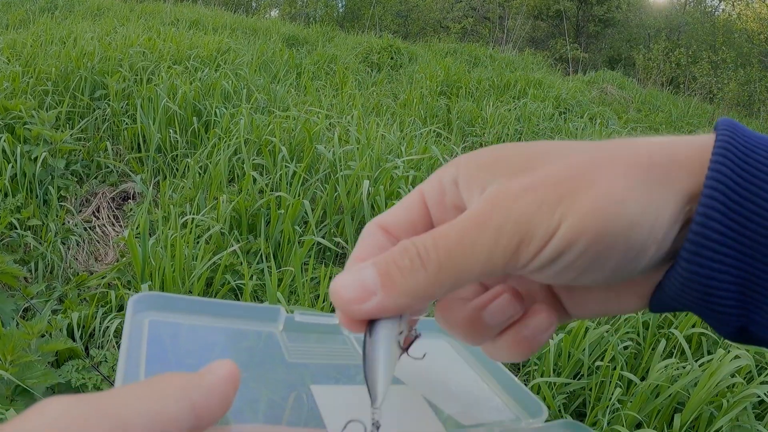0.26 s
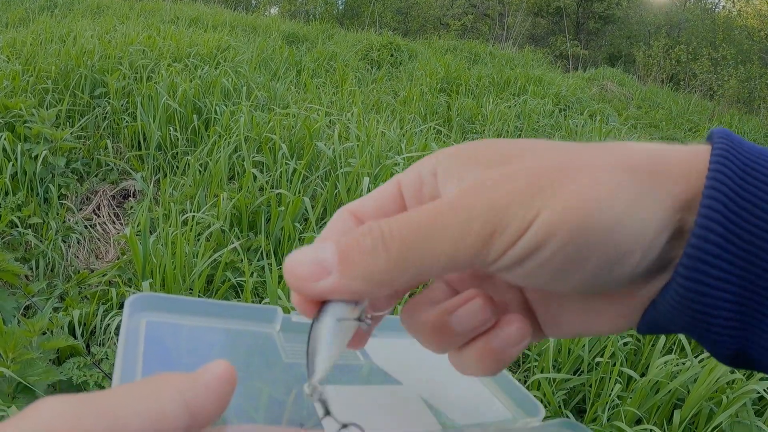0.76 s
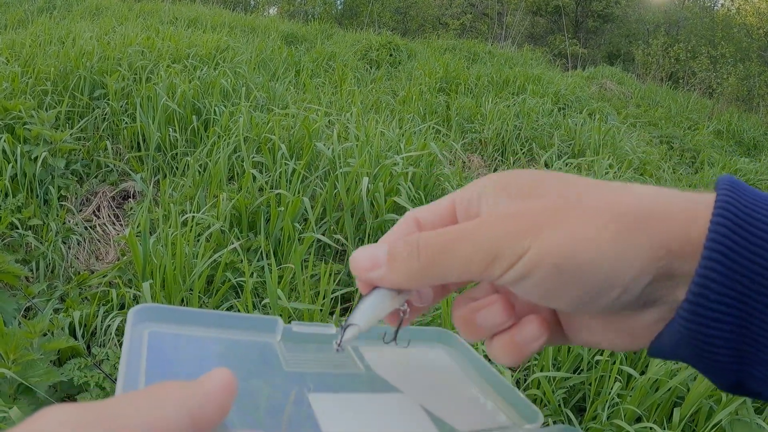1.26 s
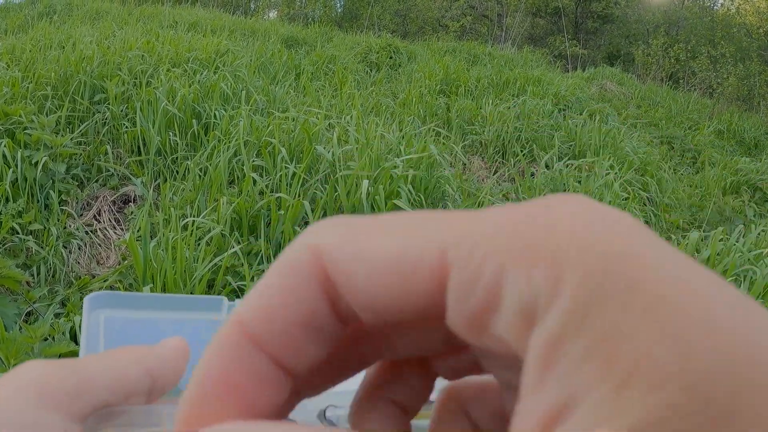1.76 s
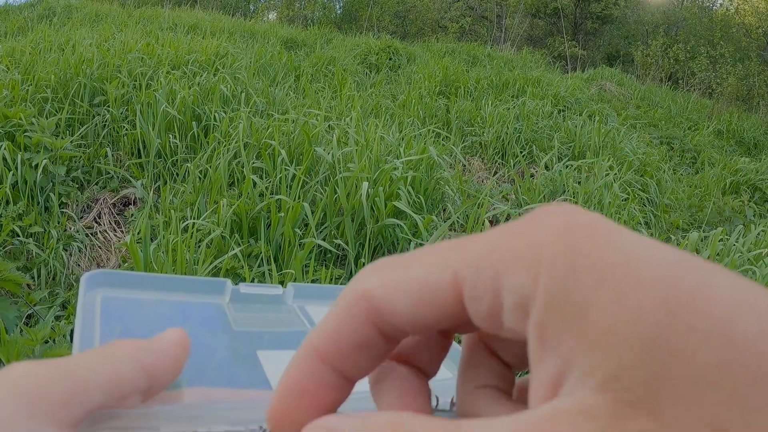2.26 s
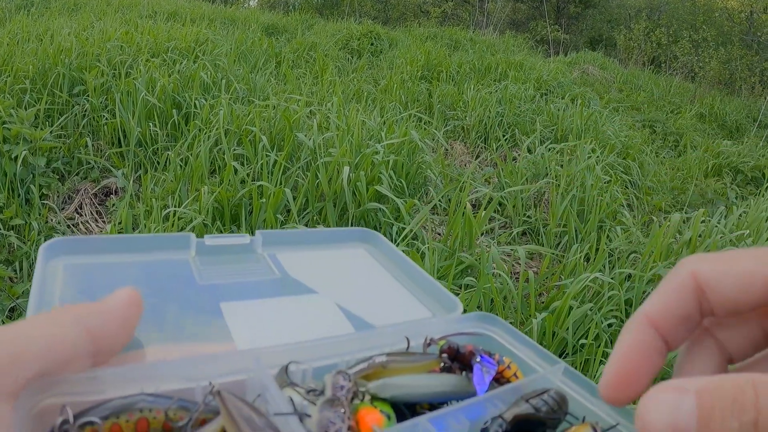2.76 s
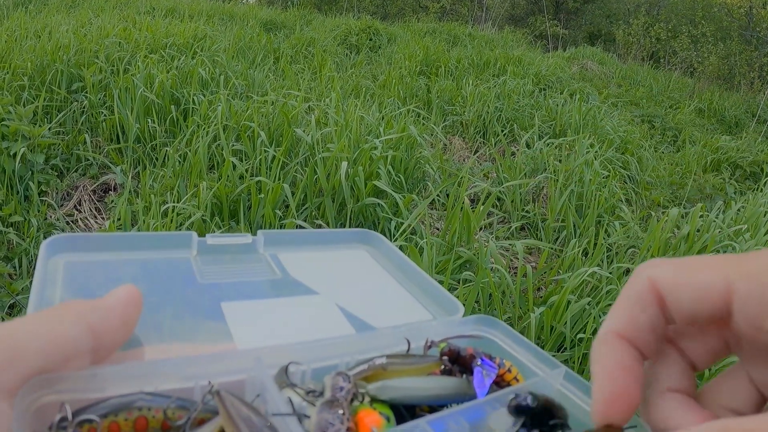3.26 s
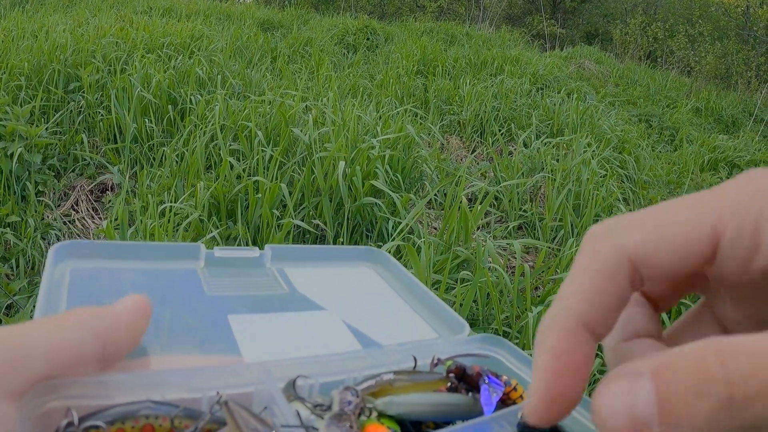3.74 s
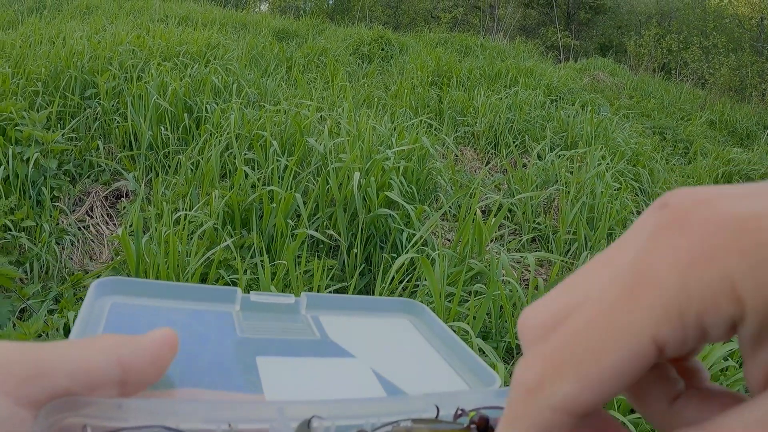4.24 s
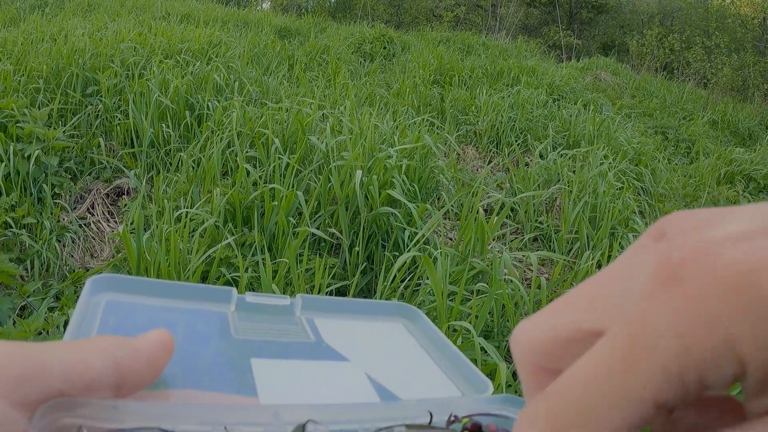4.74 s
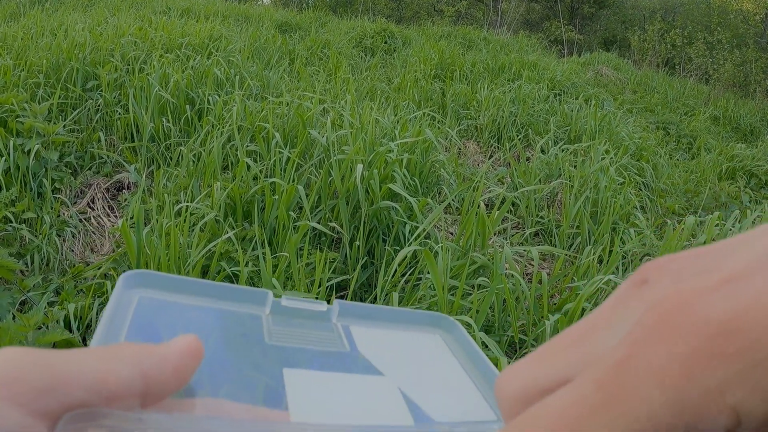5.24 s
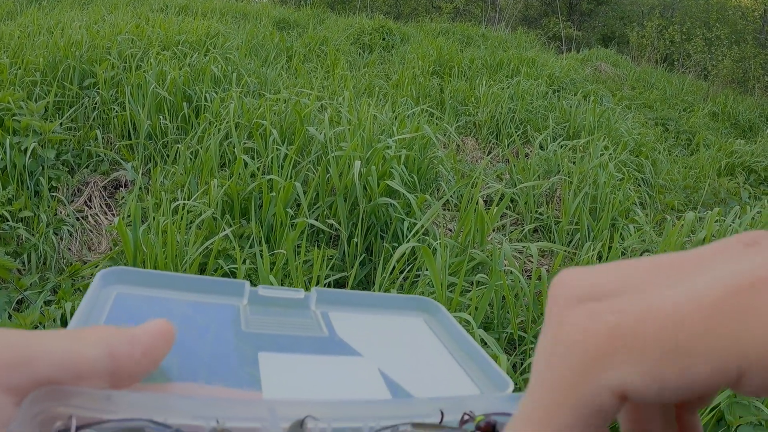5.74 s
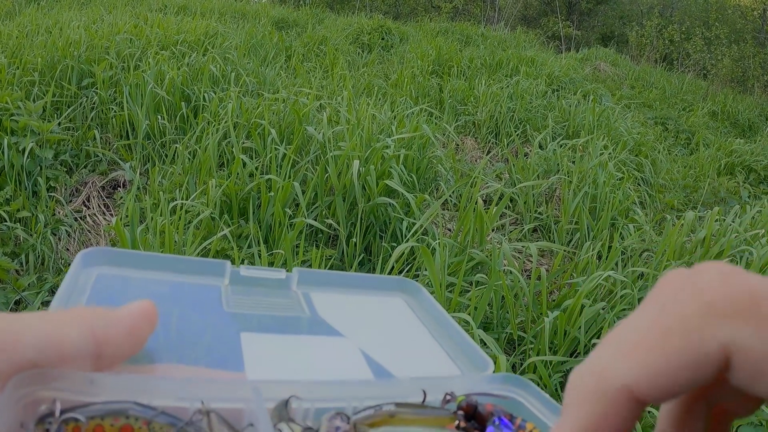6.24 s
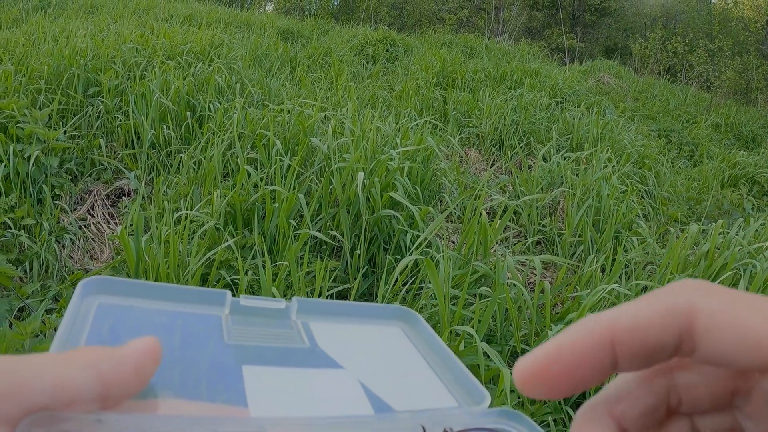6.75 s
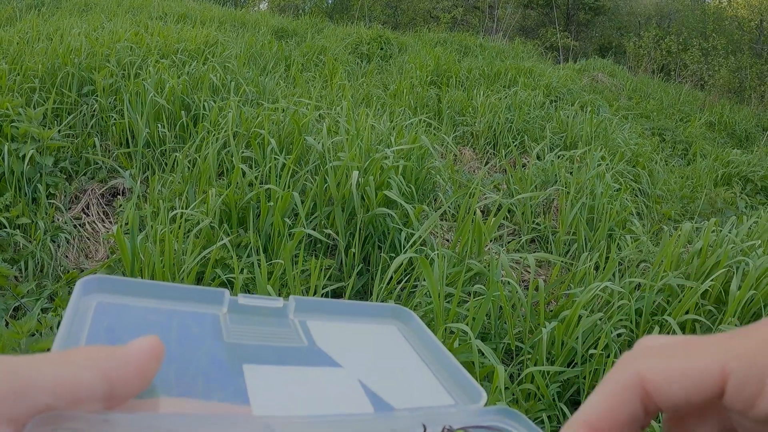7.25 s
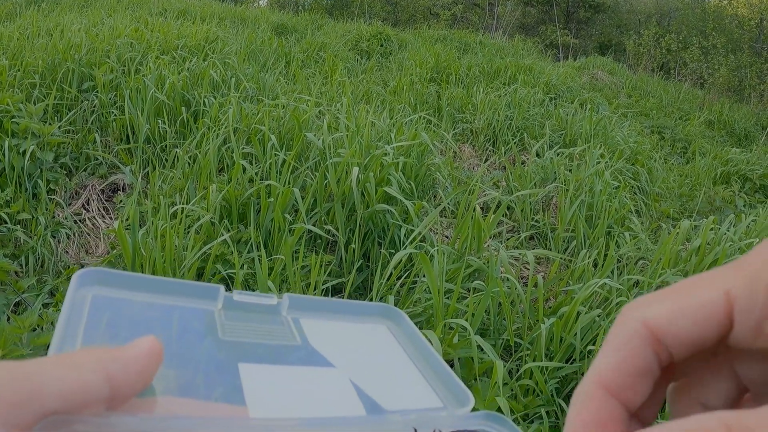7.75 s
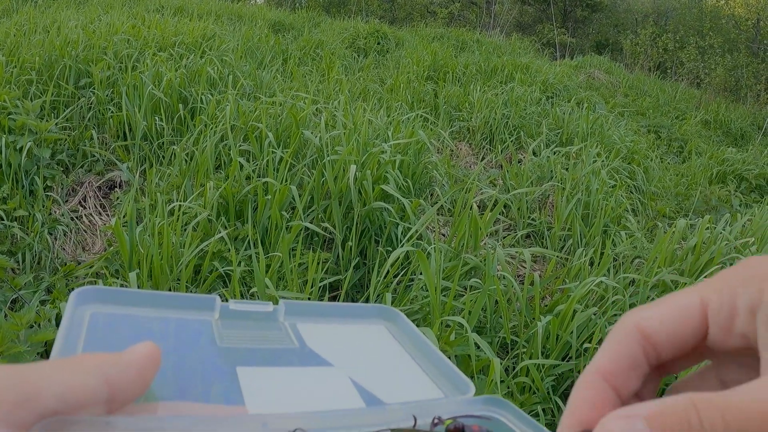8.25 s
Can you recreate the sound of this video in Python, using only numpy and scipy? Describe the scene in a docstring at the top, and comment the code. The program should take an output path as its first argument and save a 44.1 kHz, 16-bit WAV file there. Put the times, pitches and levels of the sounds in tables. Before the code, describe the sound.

Hard plastic lures with small metal hooks scrape, knock and rattle in a tray in fits and starts, with faint songbirds and river murmur outdoors.

```python
"""Sorting lures in a tackle box

A hand sorts fishing lures in a plastic box close by, in a meadow by a river. Hooks snag on the box wall,
then hollow lures rattle: damped sines plus brief noise bursts through resonances. Chatter of small random
grains follows the knocks and the fingers; thuds are low noise and a low sine. Songbirds are gliding sines,
a warbler's buzz is a gated click train with noise; hush, river murmur and wind are shaped noise.
"""
import sys
import numpy as np
from scipy import signal
from scipy.fft import rfft, irfft, next_fast_len
from scipy.io import wavfile
from scipy.ndimage import map_coordinates

SR = 44100
rng = np.random.default_rng(int(sys.argv[2]) if len(sys.argv) > 2 else 0)


def pcm_store(signal):
    """Save signal as 16-bit PCM."""
    levels = np.round(np.clip(np.atleast_2d(signal), -1, 1) * 32767)
    wavfile.write(sys.argv[1], SR, levels.astype(np.int16).T)


N = 374850

# hooks and lure on the box wall: (time [s], relative level [dB], wall ring [Hz], steel re contact [dB])
SNAGS = [(0.0111, -20.5, 2150, -9), (0.036, -16, 2200, -2.5), (0.0476, -25, 2500, -9.5),
         (0.061, -22.5, 2060, -6), (0.0948, -21, 2960, -17), (0.152, -34.5, 2000, -23),
         (0.167, -7.5, 2330, -7.5), (0.1724, -28, 1050, 15), (0.1873, -46.5, 2170, 20.5),
         (0.2622, -16.5, 2160, 5.5), (0.2692, -14, 2180, -4), (0.278, -14, 1830, -7),
         (0.291, -7.5, 2580, -14.5), (0.3, -11.5, 2250, -2), (0.309, -12, 1050, -3),
         (0.315, -15.5, 1950, 1), (0.3204, -10, 2710, -15), (0.3292, -15, 2240, -21.5),
         (0.3502, -21, 2080, -2), (0.368, -4.5, 2470, -4.5), (0.378, -7.5, 2000, -17.5),
         (0.395, -20.5, 2220, -9.5), (0.4097, -20, 1090, -3.5), (0.4188, -28, 1820, -22.5),
         (0.427, -19, 1810, -8), (0.467, -26, 1900, -18), (0.516, -12.5, 2380, -2), (0.5238, -16, 1270, 0),
         (0.5387, -17, 2140, 0), (0.5746, -16.5, 2130, -33.5), (0.5777, -19.5, 2420, -13.5),
         (0.597, -21.5, 2540, -2.5), (0.6093, -27, 2200, 3), (0.6258, -33, 2200, 2),
         (0.7084, -34, 2100, 11.5), (0.773, -26.5, 2130, -11), (0.8025, -9, 2090, -3.5),
         (0.8106, -10.5, 2040, -1.5), (0.819, -23, 1880, 7.5), (0.83, -25.5, 1920, 14.5),
         (0.8422, -24, 2330, 4), (0.8773, -17.5, 1830, -33), (0.898, -20.5, 1110, -5),
         (0.9126, -10, 2670, -13), (0.92, -13, 1870, -31), (0.931, -16, 1080, -20),
         (0.9361, -10.5, 2330, -1), (0.944, -5, 2450, -11), (0.9718, -18, 1110, -27), (0.985, -16, 2520, 6),
         (0.9998, -14, 1950, -0.5), (1.017, -17.5, 2500, -12), (1.025, -16.5, 2570, -14.5),
         (1.032, -13, 1790, -14.5), (1.038, -14.5, 2650, -18), (1.0466, -28, 2080, -3),
         (1.0566, -8.5, 2820, 0.5), (1.0752, -11, 1890, -7), (1.0864, -8.5, 2160, -1),
         (1.108, -23.5, 1010, 0), (1.145, -19.5, 1830, 11.5), (1.2533, -25.5, 2370, -2),
         (1.2915, -44, 2700, -2), (1.377, -53.5, 2700, 17.5), (1.4633, -44.5, 2770, 8),
         (1.8355, -23, 2550, 5.5), (1.849, -23, 2550, 8), (1.8585, -18, 2300, 3), (1.864, -25, 2310, 7.5),
         (1.88, -17, 2340, -6), (1.8874, -9.5, 2480, 2), (1.9027, -28, 2420, -10), (1.9205, -9.5, 2570, 3),
         (1.9319, -6, 2450, -17.5), (1.938, -20, 2420, 6), (1.959, -30, 845, 4), (2.1534, -46, 2530, 6),
         (2.169, -47, 2350, -1), (2.2546, -33, 2300, 2.5), (2.2874, -32.5, 2450, -4.5),
         (2.32, -23, 1800, -2.5), (2.3587, -11, 1960, -0.5), (2.364, -29, 2640, 4.5),
         (2.4273, -14, 1920, -8)]
# lures knocking in their tray: (time [s], relative level [dB], steel re contact [dB])
RATTLES = [(2.864, -40, 2), (2.905, -43, -12), (2.945, -49, -12), (2.9888, -40, -7), (3.0735, -19, -24),
           (3.0907, -23.5, -19), (3.1001, -18, -13), (3.1053, -22.5, -6.5), (3.179, -29, -26),
           (3.2186, -17, -8), (3.247, -21, -13), (3.2505, -24, -6), (3.2601, -11, -11), (3.3843, -17, -6.5),
           (3.3928, -23, -13.5), (3.4246, -21, 6), (3.4282, -15, 7), (3.4381, -9.5, -3.5),
           (3.4452, -10, -26), (3.4641, -3.5, -17), (3.4757, -8, -17.5), (3.482, -6.5, -21),
           (3.4883, -13, -5.5), (3.495, -10, -9), (3.5, -4.5, -5.5), (3.5085, -14, -4), (3.5157, -9.5, -20),
           (3.54, -43, -13), (3.596, -51, -15.5), (3.612, -60, -12), (3.626, -55, -22),
           (3.9319, -28.5, -14), (3.9744, -26.5, -2.5), (4.0342, -26.5, -25), (4.0756, -20.5, -10),
           (4.0895, -19.5, -20), (4.1575, -11.5, -16), (4.1744, -15, -12), (4.1788, -8, -22),
           (4.1884, -15, -9), (4.204, -17, -11), (4.3487, -40, -11.5), (4.3635, -16.5, -22),
           (4.381, -21, -9), (4.3955, -9, -4.5), (4.4061, -16.5, -2), (4.4348, -15.5, -10),
           (4.473, -20, -21), (4.4773, -26.5, 3), (4.4855, -27, -3), (4.56, -20, -5), (4.575, -8, -4),
           (4.611, -13.5, -5.5), (4.6587, -13.5, 0), (4.664, -10.5, -23), (4.6912, -16.5, -1),
           (4.72, -11.5, -10), (4.727, -7.5, -8), (4.739, -5, -13), (4.746, -25.5, 9), (4.762, -14.5, -29),
           (4.783, -21, -10), (4.797, -21, -2), (4.8094, -21, -5), (4.8225, -25.5, 0), (4.8774, -19, -25),
           (4.8843, -9, -32), (4.8929, -26.5, 16.5), (4.8987, -5, -18), (4.902, -9, -4), (4.92, -10, -13),
           (4.9426, -26, -2), (4.9523, -27, 3), (4.957, -10, -3.5), (4.9693, -30, 10.5), (5.0944, -30, 3),
           (5.116, -33.5, 8.5), (5.198, -29, -4), (5.246, -22, 0), (5.254, -3.5, -9.5), (5.3086, -28, -21),
           (5.3123, -20.5, -11), (5.333, -39, 0), (5.361, -27.5, -10), (5.4071, -26.5, -20),
           (5.437, -24, 5.5), (5.4635, -23.5, -4), (5.4869, -11, -8), (5.4978, -10.5, 0.5),
           (5.5073, -18, -2), (5.515, -12, -4), (5.5396, -25, -9), (5.6068, -29, 7), (5.853, -20, -27),
           (5.8681, -17.5, -21), (5.944, -21.5, -13), (5.9555, -14, -11), (5.959, -10, -3),
           (5.973, -10, -9), (5.9961, -16.5, 9.5), (5.9995, -14, 4), (6.005, -16, 3), (6.0128, -12, 2),
           (6.0194, -35, -15), (6.0396, -20.5, -12), (6.1187, -24.5, 3), (6.153, -29, -27.5),
           (6.245, -24, -11), (6.458, -36, 3.5), (6.5497, -9, -21), (6.5574, -30, -20), (6.5624, -15, -10),
           (6.57, -18, 6), (6.5768, -11, -14), (6.589, -17, -16), (6.647, -19, 3), (6.6518, -7.5, -20),
           (6.6658, -23, 3.5), (6.6801, -6.5, -16), (6.7282, -23.5, 1.5), (6.7575, -26, -16),
           (6.7638, -15.5, -30), (6.7701, -26, -17), (6.8024, -6.5, -16), (6.8248, -12, -11),
           (6.8305, -15, -11), (6.849, -16.5, -14), (6.86, -23.5, -19), (7.2588, -22, 0), (7.27, -12.5, 5),
           (7.291, -26, 4.5), (7.3095, -18.5, -20), (7.3317, -25.5, -20), (7.4286, -21.5, -4.5),
           (7.468, -33, -12), (7.5849, -17, -6), (7.5945, -19, -1), (7.6138, -8.5, -3), (7.6219, -13, -4),
           (7.6335, -17, -7), (7.6384, -8, 0), (7.6584, -16, -7), (7.6745, -6, -19), (7.6808, -19, -7),
           (7.7026, -26, 7), (7.71, -18, -5), (7.7209, -23.5, -19), (7.8042, -23.5, -22), (7.8733, -22, -2),
           (7.8922, -16, -8), (7.936, -29, -7), (7.96, -30, 6), (7.9708, -24, 2), (7.9771, -6.5, -2.5),
           (7.9837, -7, -18), (8.0424, -18, -13), (8.0512, -6, -8), (8.0735, -15, -1), (8.084, -13, -2),
           (8.102, -30, -8), (8.1158, -5, -2.5), (8.1303, -21, -10), (8.1403, -16, -7), (8.1563, -18, 3.5),
           (8.1791, -14, -9), (8.1908, -16, -1), (8.21, -14, 4), (8.252, -6.5, -10.5), (8.2593, -16.5, -12),
           (8.282, -15, -21), (8.2966, -15.5, -19), (8.3158, -16, -12), (8.345, -14.5, -17),
           (8.378, -13, -7), (8.3944, -10, -5.5), (8.4027, -23, -3), (8.4127, -22, -9),
           (8.4274, -5.5, -9.5), (8.4373, -14, -5), (8.4436, -16, -13), (8.4871, -23, -11)]
# whole box pushed: (time [s], relative push [dB], relative give of the hand [dB])
THUDS = [(1.229, -13, -37), (1.929, -14, -53.5), (2.259, -28, -47), (3.081, -13.5, -64), (3.435, -11, -50),
         (3.493, -4, -47), (4.39, -14.5, -58), (4.732, -16, -44), (4.909, -14.5, -39), (5.49, -13, -60),
         (7.27, -16, -45)]
# fingers among the lures: (start [s], end [s], relative rustle [dB], relative hook fizz [dB])
BOUTS = [(-.05, 0.138, -54, -3.5), (.15, 0.265, -53, -0.5), (0.272, 0.426, -36.5, -8),
         (0.469, 0.641, -54, -6), (0.681, 0.734, -54.5, 4), (0.763, 1.14, -52.5, -6), (1.183, 1.24, -55, 3),
         (1.845, 1.988, -55, -1), (2.252, 2.31, -53.5, -5.5), (2.31, 2.396, -41.5, -8.5),
         (2.428, 2.548, -63.5, -25), (2.842, 2.946, -63, -12.5), (2.972, 3.018, -53, -14),
         (3.083, 3.082, -43, -12), (3.144, 3.306, -58.5, -13.5), (3.346, 3.53, -50.5, -11.5),
         (3.942, 4.138, -52, -14), (4.129, 4.211, -39.5, -12), (4.23, 4.281, -54.5, -9),
         (4.34, 4.5, -45.5, -16), (4.52, 4.867, -52.5, -13.5), (4.85, 5.032, -45.5, -8.5),
         (5.083, 5.134, -48.5, -6.5), (5.146, 5.42, -56, -10.5), (5.441, 5.656, -42, -10),
         (5.703, 5.936, -58, -17.5), (5.917, 6.056, -52.5, -14), (6.08, 6.324, -57, -20),
         (6.429, 6.858, -50, -11), (7.255, 7.39, -53.5, -17.5), (7.382, 7.454, -45, -16.5),
         (7.482, 7.82, -50, -11.5), (7.925, 8.55, -45, -9.5)]
# mean stereo position of the handling: (time [s], left minus right [dB], left lag [samples])
PLACE = [(0, 0, .3), (1.2, .8, .3), (2.4, .5, .4), (2.9, -3.6, .9), (8.5, -2.5, .8)]
# what chatters: (time [s], share of hollow shells [0-1, clipped], relative split rings [dB])
HOLLOW = [(2.7, 0, -20), (2.9, 1, -20), (7.9, 1, -20), (8, 1, 0), (8.2, 1, 5)]
# box wall resonances: (centre [Hz], width [Hz], relative level [dB])
WALL_MODES = [(990, 393, -6.5), (2170, 680, 1.5), (460, 1900, -24)]
# hollow lure shell resonances: (centre [Hz], width [Hz], relative level [dB])
SHELL_MODES = [(2453, 322, 3.5), (1348, 1175, -11)]
# steel ring and hook resonances: (centre [Hz], width [Hz], relative level [dB])
STEEL_MODES = [(3430, 350, 0.5), (5104, 552, -3.5), (6060, 940, -16.5)]
# hook point resonances: (centre [Hz], width [Hz], relative level [dB])
POINT_MODES = [(7070, 1560, -4.5), (10900, 3300, -7.5), (11870, 1400, -4.5)]
# small split ring resonances: (centre [Hz], width [Hz], relative level [dB])
SPLIT_RING_MODES = [(9300, 820, -1.5), (12400, 450, -6)]
# whole-box bending resonances: (centre [Hz], width [Hz], relative level [dB])
FLEX_MODES = [(181, 68, 2.5), (342, 325, -6.5)]
# whistles: (start [s], length [s], first [Hz], middle [Hz], last [Hz], relative level [dB])
NOTES = [(1.189, 0.033, 3200, 2860, 2850, -51), (1.209, 0.077, 2986, 3057, 3050, -50),
         (1.35, 0.086, 3800, 3230, 3780, -50), (1.541, 0.033, 2270, 2910, 3200, -47.5),
         (1.63, 0.036, 5270, 5400, 5350, -62), (1.66, 0.077, 3440, 3660, 3870, -65),
         (1.765, .014, 3500, 3910, 4400, -53), (1.77, 0.028, 4620, 3510, 3040, -57.5),
         (2.053, 0.018, 3650, 3950, 3820, -58), (2.08, 0.019, 2630, 2960, 3100, -56),
         (2.147, 0.016, 3660, 4420, 5500, -53), (2.21, 0.015, 5050, 4050, 2700, -58),
         (2.517, 0.08, 4020, 4230, 4800, -64), (2.666, 0.03, 2760, 3620, 4130, -62),
         (2.681, 0.086, 4050, 4430, 5080, -63), (2.86, 0.072, 4020, 4600, 5000, -62),
         (3.649, 0.017, 3000, 3290, 3180, -57.5), (3.678, 0.048, 3440, 2830, 2200, -69),
         (3.852, 0.093, 3440, 3630, 3550, -60.5), (3.907, 0.14, 3520, 3260, 3140, -60),
         (5.673, 0.049, 2710, 3150, 3480, -63), (6.319, 0.064, 5500, 4120, 3250, -54),
         (6.45, 0.056, 2700, 3050, 3280, -61), (6.947, 0.021, 2660, 2470, 2500, -63),
         (6.966, 0.0386, 2650, 3200, 3220, -51), (7, 0.079, 3300, 3300, 3410, -75),
         (7.09, 0.068, 3330, 3700, 3800, -69), (7.004, 0.039, 4010, 4450, 4840, -54),
         (7.051, 0.025, 4200, 4060, 4050, -56.5), (7.073, 0.0096, 3950, 3450, 2700, -55.5),
         (7.151, 0.054, 5150, 5800, 5380, -64), (7.17, 0.046, 4530, 4750, 5000, -54.5),
         (7.317, 0.082, 4200, 3230, 2600, -56), (7.522, 0.03, 4380, 3900, 3650, -45.5),
         (7.778, 0.09, 5270, 4080, 3570, -49), (7.882, 0.055, 3440, 3300, 3120, -68)]
# warbler's running phrase count: (time [s], phrases [count])
REEL = [(-.1, -8), (1.408, 0), (2.92, 8), (4.047, 14), (5.745, 23), (7.077, 30), (8.593, 38)]
# warbler buzz spectrum: (frequency [Hz], relative density [dB/Hz])
BUZZ_SPECTRUM = [(4200, -50.5), (4800, -5), (5500, -1.5), (6500, -3), (7200, -41.5), (9000, -72.5)]
# meadow hush spectrum: (frequency [Hz], relative density [dB/Hz])
MEADOW_SPECTRUM = [(60, -14.5), (180, -0.5), (815, -10.5), (2200, -7.5), (2800, -3), (4300, -5.5),
                   (5200, -21), (6700, -11.5), (8300, -29.5), (16000, -62)]
# river murmur before its wavering: (time [s], level [dB])
WATER = [(0, -61.5), (1.4, -74), (1.7, -65.5), (2.5, -63), (3, -72), (3.8, -75), (4.3, -66.5), (7, -71),
         (8.5, -66)]
# puffs of wind on the microphone ports: (time [s], peak of the level curve [dB])
GUSTS = [(.1, -62), (.35, -48), (.68, -62), (.96, -46), (1.25, -55.5), (1.77, -60.5), (1.95, -63.5),
         (2.2, -59.5), (2.95, -66), (3.1, -65), (3.75, -66), (3.87, -61), (4.01, -55.5), (4.45, -63),
         (4.93, -54), (5.48, -60), (5.77, -59), (6.11, -50), (6.41, -60), (6.69, -60), (6.92, -57),
         (7.28, -55), (7.88, -46), (8.06, -47), (8.26, -54), (8.42, -49)]
# river murmur and wind spectra: (frequency [Hz], relative density [dB/Hz])
WATER_SPECTRUM = [(90, -70.0), (150, 2.5), (260, -1.5), (450, -8.5), (800, -26)]
WIND_SPECTRUM = [(12, -12), (28, 0), (45, -6), (70, -20), (120, -45)]
# camera response below its band limit: (frequency [Hz], gain [dB])
CAMERA_RESPONSE = [(7000, 0.5), (14000, -5.5), (16400, -26.0)]

BOUT_RISE_DB_PER_S, BOUT_FALL_DB_PER_S = 2500, 901
STIR_DB, STIR_DB_PER_DB = -28, 0.78  # relative chatter from a 0 dB knock; growth per dB of knock
LEAD_T60_S, SETTLE_T60_S = 0.032, 0.1  # chatter swells into a knock and settles after it
SOFT_HZ = 3420  # plastic on plastic drives little above this
GIVE_HZ = 90.5  # the hand giving under a thud
CALM_DB, GUST_SLOPE_DB_PER_S = -76, 201
CHIPS_START_S, CHIP_GAP_S, CHIP_REL_DB, CHIP_STEP_DB = 3.811, 0.0147, -69, 3
BAND_LIMIT_HZ = 16450


def amp(db):
    """Decibels to amplitude gain."""
    return 10 ** (np.asarray(db) / 20)


def unit(x):
    """Scale to rms 1."""
    return x / np.sqrt(np.mean(x ** 2) + 1e-20)


def along(points, hz):
    """Interpolate (Hz, value) points on a log frequency axis."""
    f, v = np.transpose(points)
    return np.interp(np.log(hz + 1), np.log(f + 1), v)


def curves(rows):
    """Interpolate each column after the time to one value per sample."""
    s, *cols = np.transpose(rows)
    return [np.interp(np.arange(N) / SR, s, c) for c in cols]


def wobble(knots_per_s):
    """Smooth random curve: a spline through normal draws."""
    knots = rng.standard_normal(int(N * knots_per_s / SR) + 4)
    return map_coordinates(knots, [np.arange(N) * knots_per_s / SR])


def filtered(x, response):
    """Multiply the zero-padded spectrum of x by a function of frequency."""
    m = next_fast_len(N + SR // 2)
    return irfft(rfft(x, m) * response(np.fft.rfftfreq(m, 1 / SR)), m)[..., :N]


def rung(x, modes):
    """Sum of causal second-order resonances with alternating signs."""
    def response(f):
        total = 0
        for k, (centre, width, db) in enumerate(modes):
            drag = 1j * f * width
            total = total + (-1) ** k * amp(db) * drag / (centre * centre - f * f + drag)
        return total
    return filtered(x, response)


def placed(s, shapes):
    """Add one short waveform per row at its time."""
    at = np.round(s * SR).astype(int)[:, None] + np.arange(shapes.shape[1])
    return np.bincount(at.ravel(), shapes.ravel(), N + SR)[:N]


def noise(spectrum, alike):
    """Shaped stereo noise of rms 1; alike is the left-right correlation."""
    turn = np.arccos(np.clip(alike, -1, 1)) / 2
    mid, side = filtered(rng.standard_normal((2, N)), lambda hz: amp(along(spectrum, hz)))
    mid, side = np.cos(turn) * mid, np.sin(turn) * side
    return unit(np.array([mid + side, mid - side]))


def box():
    """All handling, panned by level and lag; each side adds its own close reflections."""
    s, db, steel_db = np.transpose(RATTLES)
    shell_hz = 2420 * (1 + .05 * rng.standard_normal(len(s)))  # every knock meets a slightly different shell
    snags = contacts(*np.transpose(SNAGS), WALL_MODES, ring_t60_s=0.011, body_db=4.0)
    rattles = contacts(s, db, shell_hz, steel_db, SHELL_MODES, ring_t60_s=0.0074, body_db=5.5)
    handling = snags + rattles + chatter() + thuds()

    side_db, lag = curves(PLACE)
    side_db = side_db + wobble(60)  # touches come from all over the tray
    lag = lag + .6 * wobble(60)
    shift = lag / 2 * np.gradient(handling)  # a small delay approximated by the slope
    t = np.arange(SR // 25) / SR
    near = rng.standard_normal((2, len(t))) * amp(-60 * t / .03)
    near = near / np.linalg.norm(near, axis=1, keepdims=True)
    echo = signal.fftconvolve(handling[None], near, axes=1)[:, :N]
    pair = np.array([handling - shift, handling + shift]) + amp(-14) * echo
    return pair * amp([side_db / 2, -side_db / 2])


def contacts(s, db, hz, steel_db, body_modes, ring_t60_s, body_db):
    """Each contact rings as damped sines; its brief scrape excites body, steel and hook points."""
    t = np.arange(SR // 40) / SR
    draw = rng.standard_normal((len(s), len(t) + 2))
    press = t / 0.00058 * np.exp(1 - t / 0.00038)  # the surfaces press together, then part
    tail = .45 * (t > .0005) * amp(-60 * t / .016)
    scrape = np.maximum(press, tail) * draw[:, 2:]
    scrape = scrape / np.linalg.norm(scrape, axis=1, keepdims=True) * 7
    scrape[:, SR // 2000] += 2.5  # the hard first touch

    def struck(ring_hz, t60_s):
        envelope = amp(-60 * t / t60_s) * (1 - np.exp(-t / 0.00053))
        return envelope * np.sin(2 * np.pi * ring_hz[:, None] * t)

    def lay(level_db, shape):
        return placed(s - .0007, amp(level_db)[:, None] * shape)  # early, so the onset peaks near s

    # a different hook answers each time
    hook_hz = np.where(draw[:, 0] > .4, 5100, 3560) * np.exp(0.05 * draw[:, 1])
    bright_db = bouts(s)[1]
    point_db = 0.99 * steel_db + 0.53 * bright_db + 3 * draw[:, 0]  # bright where the hooks are busy
    body_scrape = filtered(lay(db + body_db, scrape), lambda f: (1 + 1j * f / SOFT_HZ) ** -2)
    ring = lay(db + 0.15, struck(hz, ring_t60_s))
    hook_ring = lay(db + steel_db - 10.0, struck(hook_hz, 0.013))
    steel = rung(lay(db + steel_db + 5.5, scrape), STEEL_MODES)
    points = rung(lay(db + point_db + 0.5, scrape), POINT_MODES)
    return ring + hook_ring + rung(body_scrape, body_modes) + steel + points


def chatter():
    """Clumps of small random touches ring shells, wall, steel and rings; the box rumbles along."""
    body_db, bright_db = stir()
    hollow, split_db = curves(HOLLOW)
    hollow = np.clip(hollow, 0, 1)
    touched = rng.random(N) < 700 / SR  # 700 touches a second on average
    touches = touched * amp(5 * rng.exponential(size=N).clip(0, 2) + 3 * wobble(45))
    shares = touches * amp(3 * rng.standard_normal((3, N)))  # each touch favours body, steel or fizz
    t = np.arange(SR // 100) / SR
    grain = t * np.exp(-t / 0.00058)
    grains = signal.fftconvolve(shares, grain[None], axes=1)[:, :N] * rng.standard_normal((3, N))
    bed = .6 * amp(3 * wobble(30)) * rng.standard_normal((3, N))
    low, high, top = unit(grains) + bed

    body = hollow * unit(rung(low, SHELL_MODES)) + (1 - hollow) * unit(rung(low, WALL_MODES))
    at = np.flatnonzero(touches)
    tick_hz = 2600 * np.exp(0.368 * rng.standard_normal((len(at), 1)))
    tick_envelope = amp(-60 * t / 0.0055) * (1 - np.exp(-t / .0005))
    ticks = touches[at, None] * tick_envelope * np.sin(2 * np.pi * tick_hz * t)
    body = body + amp(-7) * unit(placed(at / SR, ticks))
    body = body + amp(-4.5) * unit(rung(high, STEEL_MODES))
    body = body + amp(-23) * unit(rung(low, FLEX_MODES))
    fizz = unit(rung(top, POINT_MODES)) + amp(split_db) * unit(rung(top, SPLIT_RING_MODES))
    return amp(body_db) * (body + amp(bright_db) * fizz)


def stir():
    """Chatter level and brightness [dB]: power shaken loose by knocks, plus the fingers' rustle."""
    s, db = np.transpose([row[:2] for row in SNAGS + RATTLES])
    t = np.arange(-SR // 2, SR // 2 + 1) / SR
    shake = amp(-60 * np.where(t < 0, -t / LEAD_T60_S, t / SETTLE_T60_S)) ** 2
    knocks = placed(s, amp(STIR_DB + STIR_DB_PER_DB * db)[:, None] ** 2)
    power = np.abs(signal.fftconvolve(knocks, shake, "same"))
    rustle_db, bright_db = bouts(np.arange(N) / SR)
    return 10 * np.log10(power + amp(rustle_db) ** 2 + 1e-20), bright_db


def bouts(t):
    """Rustle level and brightness [dB] of the loudest bout at t; each fades linearly in dB outside its span."""
    start, end, db, bright_db = np.transpose(BOUTS)[:, :, None]
    fade_db = np.maximum(BOUT_RISE_DB_PER_S * (start - t), BOUT_FALL_DB_PER_S * (t - end))
    level_db = db - np.maximum(fade_db, 0)
    return level_db.max(axis=0), bright_db[level_db.argmax(axis=0), 0]


def thuds():
    """Decaying noise pushes bend the box; the hand's give is a damped low sine."""
    s, push_db, give_db = np.transpose(THUDS)
    t = np.arange(SR // 10) / SR
    envelope = amp(-60 * t / 0.079) * (1 - np.exp(-t / 0.01))
    push = amp(push_db)[:, None] * envelope * rng.standard_normal((len(s), len(t)))
    give = amp(give_db)[:, None] * envelope * np.sin(2 * np.pi * GIVE_HZ * t)
    return rung(placed(s, push), FLEX_MODES) + placed(s, give)


def songbirds():
    """Gliding sines, and four steep falling chips that grow louder."""
    out = np.zeros(N + SR)
    chips = [(CHIPS_START_S + CHIP_GAP_S * k, .011, 4000, 3400, 2800, CHIP_REL_DB + CHIP_STEP_DB * k)
             for k in range(4)]
    for s, length, first, middle, last, db in NOTES + chips:
        u = np.linspace(0, 1, round(length * SR))
        slope = 4 * middle - 3 * first - last
        bend = 2 * (first + last - 2 * middle)
        hz = first + slope * u + bend * u * u  # parabola through three pitches
        swell = np.sin(np.pi * u) ** 0.9
        out[round(s * SR):][:len(u)] += amp(db + 3) * swell * np.sin(2 * np.pi * np.cumsum(hz) / SR)
    return out[:N] * amp(4.1 * wobble(70))  # moving air makes far song flutter


def warbler():
    """Each phrase holds three buzzes of fast clicks and noise, and two thin sine ticks."""
    phrase = curves(REEL)[0]
    beat = (3 * phrase + 0.58) % 1
    gate = np.clip(np.minimum(beat, .5 - beat) / 0.092, 0, 1)
    click_hz = 270 * (1 + 0.08 * wobble(51))
    clicks = np.diff(np.floor(np.cumsum(click_hz) / SR), prepend=0)
    rough = unit(clicks) + 0.74 * rng.standard_normal(N)
    buzz = unit(filtered(rough, lambda hz: amp(along(BUZZ_SPECTRUM, hz))))
    t = np.arange(N) / SR

    def tick(at, hz):
        offset = (phrase - at + .5) % 1 - .5  # in phrases
        return np.exp(-(offset / .018) ** 2) * np.sin(2 * np.pi * hz * t)

    ticks = amp(-62) * tick(0, hz=6680) + amp(-68 + 3 * wobble(3)) * tick(.655, hz=7120)
    return amp(-67 + 1.7 * wobble(4.1)) * gate * buzz + ticks


def trees(x):
    """Far song, slightly louder on the left than the right, with a diffuse decaying-noise tail from the wood's
    edge."""
    t = np.arange(SR // 2) / SR
    tail = rng.standard_normal((2, len(t))) * amp(-60 * t / .5)
    tail = tail / np.linalg.norm(tail[0])
    diffuse = signal.fftconvolve(x[None], tail, axes=1)[:, :N]
    return x * amp([[0.0], [0.0]]) * 0 + x * amp([[.7], [-.7]]) + amp(-3) * diffuse


def outdoors():
    """Shaped noise: meadow hush, the river's low murmur, and lumps of wind on the ports."""
    hush = amp(-64.5 + 0.19 * wobble(14.0)) * noise(MEADOW_SPECTRUM, alike=0.067)
    murmur = amp(curves(WATER)[0] + 1.4 * wobble(30)) * noise(WATER_SPECTRUM, alike=0.92)
    buffet = noise(WIND_SPECTRUM, alike=.82)
    wind = amp(gusts()) * unit(amp(3.2 * wobble(6.3)) * buffet)
    return hush + murmur + wind


def gusts():
    """Wind level [dB]: each puff rises and falls at one slope above a calm floor."""
    s, db = np.transpose(GUSTS)[:, :, None]
    puffs_db = db - GUST_SLOPE_DB_PER_S * np.abs(np.arange(N) / SR - s)
    return np.maximum(CALM_DB, puffs_db.max(axis=0))


def scene():
    """Box in front, birds and river behind."""
    return box() + trees(songbirds() + warbler()) + outdoors()


def record(dry):
    """The camera rounds off the hardest peaks, rolls off the treble and cuts all above its band limit."""
    ceiling = .75
    soft = dry / (1 + np.abs(dry / ceiling) ** 4) ** (1 / 4)
    return filtered(soft, lambda hz: amp(along(CAMERA_RESPONSE, hz)) * (hz < BAND_LIMIT_HZ))


dry = scene()
out = record(dry)
pcm_store(out)
```